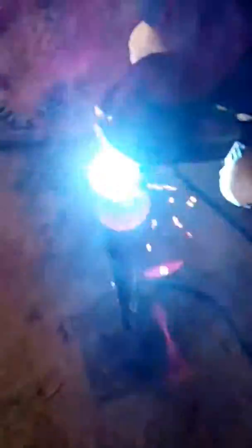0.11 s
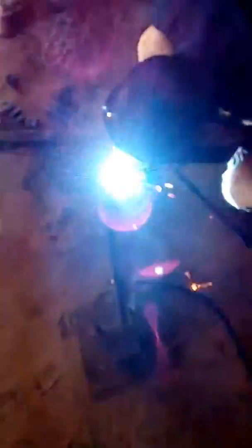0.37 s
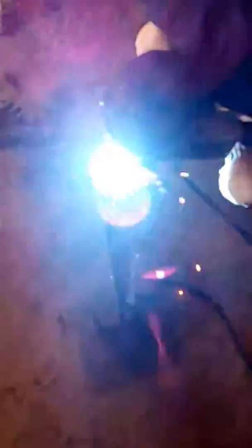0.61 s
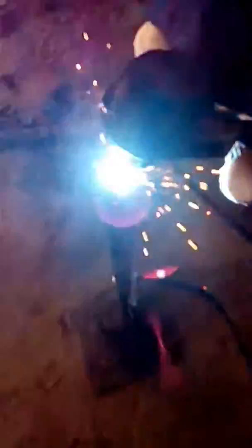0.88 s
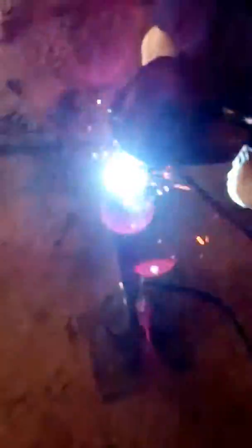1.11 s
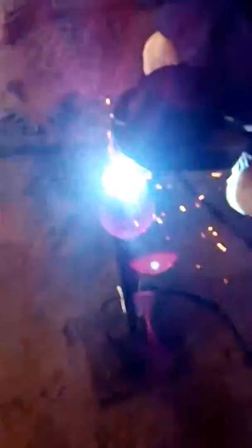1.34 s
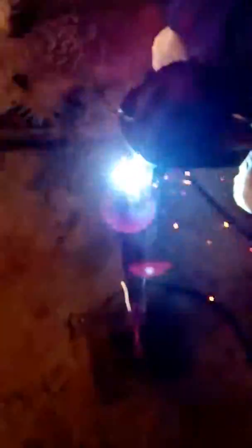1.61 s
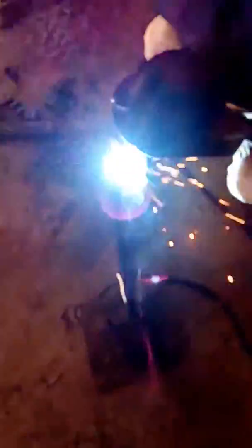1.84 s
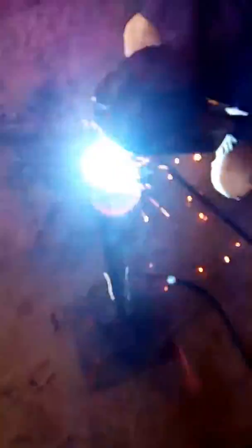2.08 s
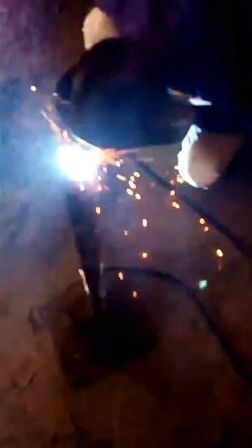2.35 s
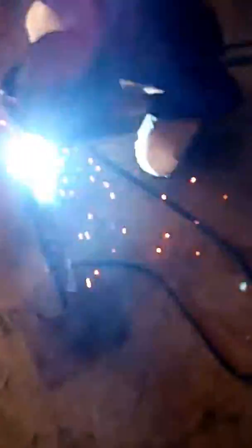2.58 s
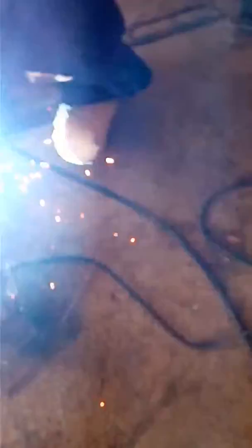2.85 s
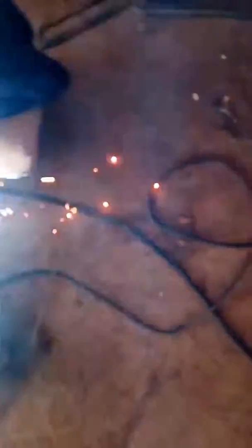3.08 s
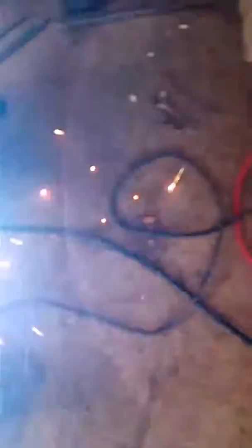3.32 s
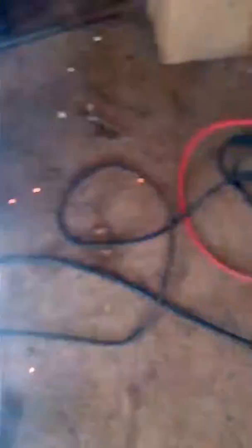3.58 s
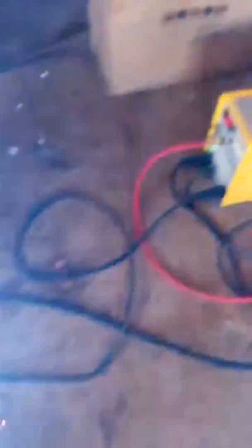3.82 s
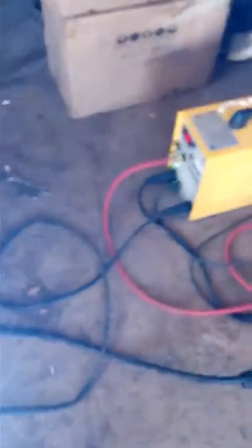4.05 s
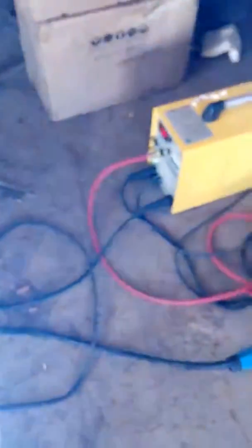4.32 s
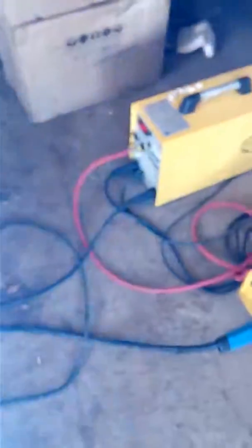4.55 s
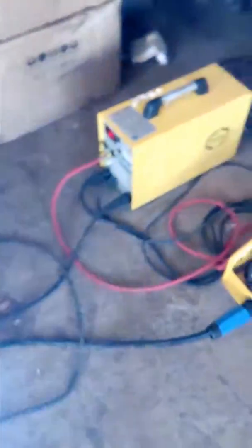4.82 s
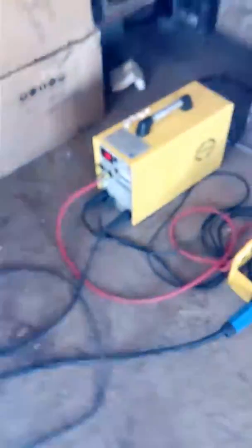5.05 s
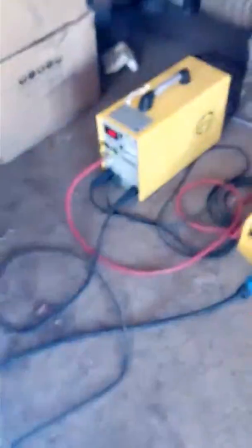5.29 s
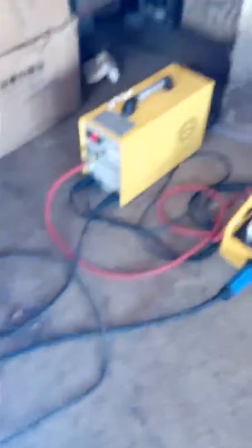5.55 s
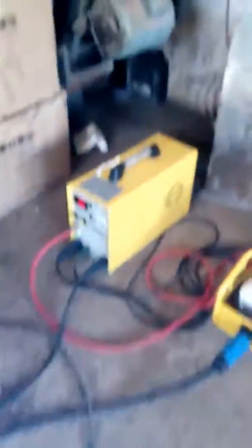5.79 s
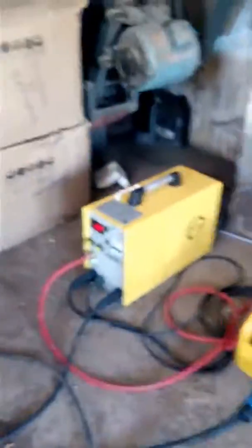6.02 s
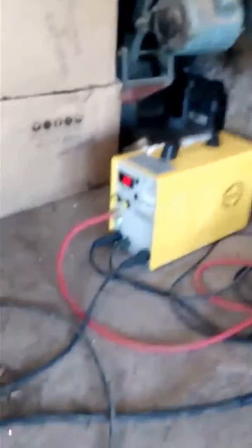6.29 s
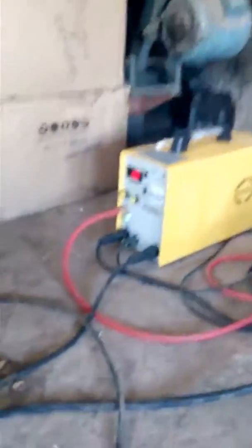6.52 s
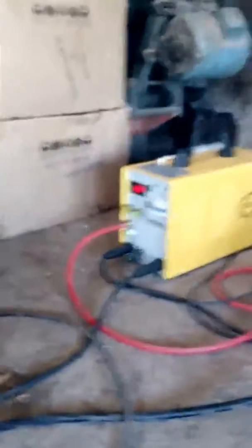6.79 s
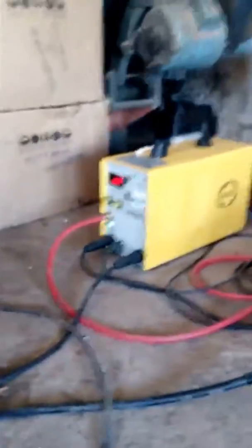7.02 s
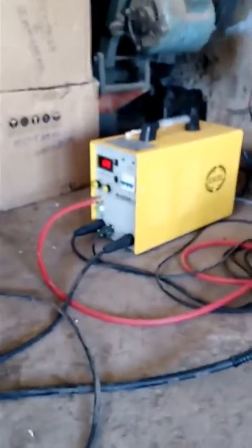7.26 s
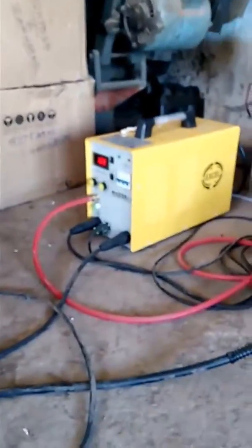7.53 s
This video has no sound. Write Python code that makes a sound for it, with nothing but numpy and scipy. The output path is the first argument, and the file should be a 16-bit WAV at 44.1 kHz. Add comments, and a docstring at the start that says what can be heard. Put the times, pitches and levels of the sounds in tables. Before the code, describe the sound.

Dense, bright, nearly even welding crackle with harsh distorted snaps and plasma hiss, short room reverberation, and a couple of soft low bumps on the microphone.

```python
"""Wire-feed welding up close

A wire-feed welding arc crackles in a workshop; a hand-held phone close by slowly turns away from it.
Each time the wire shorts and the arc strikes again it pops: a click with a short sputter of noise.
Steel, floor and walls send every pop back, the plasma hisses between, and the welder's fan hums in narrow
bands of noise. Soft low thumps push the right microphone. The two microphones are opposed in polarity
for the arc's direct sound and near echoes, and overload on the loudest peaks."""
import sys
import numpy as np
from scipy import signal
from scipy.fft import rfft, irfft, next_fast_len
from scipy.io import wavfile
from scipy.ndimage import map_coordinates

SR = 44100
rng = np.random.default_rng(int(sys.argv[2]) if len(sys.argv) > 2 else 0)


def dump_mix(stems):
    """Bounce the given channels to the path in sys.argv[1] as a 16-bit WAV at rate SR."""
    frames = np.atleast_2d(stems).T  # one column per channel
    limited = np.clip(frames, -1, 1)  # hard clip at full scale
    pcm = np.round(limited * 32767).astype(np.int16)
    wavfile.write(sys.argv[1], SR, pcm)


def elevation(decibels):
    """Turn decibel levels (scalar or array-like) into linear amplitude ratios."""
    levels = np.asarray(decibels, float)
    return 10 ** (levels / 20)


N = 336924

# The loudest re-strikes of the arc. Each row: time in seconds, level in dB before a common trim.
LOUD_STRIKES = [(0.0729, -6), (0.107, -3), (0.2327, -8), (0.2828, -6), (0.3341, -4), (0.4832, 2),
                (0.5286, 0), (0.5895, -2.5), (0.61, -7), (0.634, -6), (0.6631, -4), (0.7407, -1),
                (0.7812, 0), (0.8369, -2), (0.8746, -1.5), (0.9481, 1.5), (1, 0.5), (1.071, -10),
                (1.1843, 1), (1.2312, 0), (1.285, -1), (1.3249, 1), (1.4599, -3), (1.5332, 3.5),
                (1.5838, 2), (1.6277, 1.5), (1.7007, -2), (1.7989, -6), (1.8364, -1), (1.9031, 0),
                (1.932, 0), (1.9748, 2), (2.0542, -6), (2.1387, -2), (2.1863, 1.5), (2.2061, 2),
                (2.3166, 0), (2.357, -3.5), (2.383, -8), (2.4166, 1), (2.445, 4), (2.5846, 2.5),
                (2.6315, 1), (2.6523, 2), (2.7934, 5), (2.832, 4), (2.9008, 2), (2.9373, 2), (2.9979, 4.5),
                (3.023, 0), (3.05, -0.5), (3.0844, -2), (3.1088, 3), (3.1306, 2), (3.1558, 2), (3.2221, 5),
                (3.256, -4), (3.2881, -2), (3.3699, -0.5), (3.4066, -4), (3.4276, 1), (3.4861, -3),
                (3.5095, 5), (3.548, -1), (3.5694, 0.5), (3.6072, 3.5), (3.71, -1), (3.7585, -1),
                (3.818, -3), (4.2251, -2.5), (4.2587, 1), (4.3135, 1.5), (4.4379, -2), (4.5555, -10),
                (4.8211, 2.5), (4.8617, 1), (4.9003, -0.5), (4.9204, 2.5), (4.9521, -5), (4.9796, 1),
                (5.0115, -4), (5.0532, 1.5), (5.0782, 5), (5.1118, 3.5), (5.136, 0), (5.156, -5),
                (5.225, 0.5), (5.2463, -1), (5.2969, -6), (5.3407, -4), (5.3738, -6), (5.3999, -2),
                (5.459, -2), (5.5047, -3), (5.5243, -3), (5.5451, -1), (5.5733, -1), (5.5982, 0.5),
                (5.6199, -3), (5.682, -6), (5.7053, -5), (5.7775, -11), (5.8438, -5), (6.0434, 4),
                (6.0865, -1), (6.1156, 0), (6.1586, 4.5), (6.1962, -3), (6.2867, 3), (6.3452, -3),
                (6.4133, -7), (6.4988, 3), (6.5281, 5.5), (6.629, -3), (6.6516, 3.5), (6.8087, 4),
                (6.8508, 3), (6.904, 0), (6.9469, 2), (7.016, 1.5), (7.0651, 1.5), (7.0844, -1),
                (7.1317, 0.5), (7.1613, 5), (7.1861, 1.5), (7.2627, 4), (7.3029, -1.5), (7.3634, 0),
                (7.4536, 0.5), (7.5453, 2)]
CLICK_DB = 15   # lift of the bare clicks, ahead of the sputter's own path levels


def at_hz(points, hz):
    """A table read on a log-frequency axis."""
    table = np.array(points, float)
    return np.interp(np.log(hz + 1), np.log(table[:, 0] + 1), table[:, 1])


def in_time(rows):
    """Columns of a curve at every sample."""
    s, *columns = np.transpose(rows)
    return [np.interp(np.arange(N) / SR, s, column) for column in columns]


def samples_at(seconds):
    """Nearest sample to each time."""
    return np.round(np.asarray(seconds) * SR).astype(int)


def rms_one(x):
    """Scaled to unit rms."""
    return x / np.sqrt(np.mean(x ** 2) + 1e-20)


def causal(db):
    """Minimum-phase filter with this level per bin: it rings after a click, never before."""
    cepstrum = irfft(db * np.log(10) / 20)
    cepstrum[1:len(db) - 1] *= 2
    cepstrum[len(db):] = 0
    return np.exp(rfft(cepstrum))


def pair(shared, own, hz):
    """Left and right spectra from a shared and an opposed part, mixed to a likeness per frequency."""
    # How alike the microphones hear diffuse sound. Each row: Hz, left-right likeness from -1 to 1.
    likeness = [(60, 0.71), (130, -1), (290, -0.94), (640, -0.62), (1400, -0.019), (3090, -0.0066),
                (6800, -0.2), (15000, 0.46)]
    alike = np.clip(at_hz(likeness, hz), -.98, .98)
    opposed = np.sqrt(1 - alike) * own * np.c_[[1, -1]]
    return (np.sqrt(1 + alike) * shared + opposed) / np.sqrt(2)


def drips():
    """The wire shorts at a near-even pace from one loud strike to the next, at times striking once more midway."""
    # The drip of the wire. Each row: time in seconds, shorts per second, strike level in dB,
    # chance of a weaker strike midway (0-1).
    drip_pace = [(0, 56.7, -3, .75), (1.3, 52.4, -4, .6), (1.599, 47.2, -2.5, .35), (2.6, 46.5, -4, .3),
                 (3.3, 56.8, -1, .3), (3.9, 52.2, -2.5, .5), (4.5, 53.4, -1, .65), (5.1, 44.5, -5.5, .35),
                 (5.8, 47, -1.5, .6), (6.3, 48.4, -2.5, .3), (7.0, 49.4, -3, .3), (7.3, 50.5, -7.5, .3),
                 (7.64, 48.4, -4, .3)]
    jitter_cycles, spread_db, midway_db = .16, 2.5, -4   # jitter and spread are standard deviations
    s, per_s, level_db, chance = np.transpose(drip_pace)
    ends = [-.01] + [t for t, db in LOUD_STRIKES] + [N / SR]
    times = []
    for start, end in zip(ends, ends[1:]):
        shorts = max(1, round((end - start) * np.interp((start + end) / 2, s, per_s)))
        halves = 2 * shorts
        times += [(start + (end - start) * k / halves, k % 2) for k in range(1, halves)]
    t, midway = np.transpose(times)
    level_luck, time_luck = rng.standard_normal((2, len(t)))
    struck = (midway == 0) | (rng.random(len(t)) < np.interp(t, s, chance))
    strike_db = np.interp(t, s, level_db) + midway_db * midway + spread_db * level_luck
    t = t + jitter_cycles * time_luck / np.interp(t, s, per_s)
    return np.clip(t * SR, 0, N - 1).astype(int), elevation(strike_db) * struck


def pops():
    """When the arc strikes and how hard: loud strikes, steady drip, random rain of small ones; and the hiss level."""
    # The arc's course. Each row: time in seconds, small re-strikes per second,
    # base level in dB from which small strikes and hiss are set.
    arc_course = [(0.0, 97, -16.5), (2.53, 105, -17), (3.4, 153, -19), (3.89, 146, -15.5),
                  (4.81, 100, -16.5), (5.89, 132, -14), (6.13, 141, -11), (6.49, 160, -12.5),
                  (7.0, 94.5, -13.5), (7.32, 101, -17.5), (7.64, 186, -18.5)]
    loud_trim_db, small_db, hiss_db = -1.25, -4.5, -8.5
    per_s, level_db = in_time(arc_course)
    clicks = np.zeros(N)
    where, strength = drips()
    clicks[where] = strength
    seconds, loud_db = np.transpose(LOUD_STRIKES)
    clicks[samples_at(seconds)] = elevation(loud_db + loud_trim_db)
    sizes = elevation(3.0 * np.minimum(rng.exponential(1, N), 2.5))   # 0 to 7.5 dB above the smallest
    small = sizes * (rng.random(N) < per_s / SR)
    return clicks + elevation(level_db + small_db) * small, elevation(level_db + hiss_db)


def late(x, ms):
    """The sound read this much later, between samples."""
    return map_coordinates(x, [np.arange(N) - ms * SR / 1000], order=3)


def heard(x):
    """Direct sound, floor echo and near echoes at two microphones of opposed polarity, by their path delays."""
    # Paths as the phone turns. Each row: time in seconds, delay of the left microphone after the right in ms,
    # floor echo after the direct sound at left in ms, at right in ms.
    turning_paths = [(0, .108, 1.875, 2.005), (1.8, .108, 1.868, 1.98), (2.6, .13, 1.87, 1.95),
                     (3.0, .115, 1.86, 1.91), (3.8, .011, 1.87, 1.905), (4.6, -.034, 1.86, 1.88),
                     (5.0, -.08, 1.86, 1.95), (5.4, -.09, 1.855, 2.08), (5.8, -.113, 1.88, 2.07),
                     (6.3, -.096, 1.95, 1.84), (6.45, .385, 1.87, 1.84), (7.0, .51, 1.87, 1.84),
                     (7.64, .47, 1.87, 1.84)]
    # Nearby steel and boxes. Each row: echo delay at left in ms, at right in ms, level in dB.
    near_echoes = [(.705, .7, -14.5), (1.692, 1.68, -14.5), (2.215, 2.28, -10), (.9, 2.72, -12.5)]
    floor_db = -7.5
    lead_ms, *floor_ms = in_time(turning_paths)
    sides = []
    for k in (0, 1):
        side = x + elevation(floor_db) * late(x, floor_ms[k])
        for row in near_echoes:
            side = side + elevation(row[2]) * np.roll(x, round(row[k] * SR / 1000))
        sides.append(side)
    return np.array([-late(sides[0], lead_ms), sides[1]])


def workshop(size, hz):
    """Dense tail of the room as fading noise, weaker in the treble, for both microphones."""
    # Each row: Hz, tail against direct sound in dB.
    room_colour = [(200, 4), (1500, 3.5), (4000, -3), (12000, -7.5)]
    t60_s = 0.45
    t = np.arange(size) / SR
    tail = rng.standard_normal((2, size)) * elevation(-60 * np.minimum(t / t60_s, 3))
    tail = tail / np.sqrt(np.sum(tail ** 2, axis=1, keepdims=True))
    return elevation(at_hz(room_colour, hz)) * pair(*rfft(tail), hz)


def arc():
    """Every pop is a click with its own sputter and a floor echo; colour and tail cross-fade as the phone turns."""
    # Four headings of the phone. Each row: time in seconds, heading from 0 (facing the arc) to 3 (turned away).
    phone_turn = [(0, 0.5), (2.6, 0), (3.2, 2), (3.7, 1), (4.2, 2), (5.5, 3), (6.2, 3), (7.64, 3)]
    # Colour of the arc at each heading, overall level evened out below. Each row: Hz, relative dB per Hz.
    facing = [(88, -53), (150, -21), (355, -19.5), (551, -18), (978, -18.5), (1180, -16), (1350, -18.5),
              (1470, -5), (1920, -17), (3140, -7), (3710, -6.5), (4040, -3.5), (4950, -8), (6490, 2.5),
              (8500, -6), (11000, -35.5), (18700, -120)]
    turning = [(88, -57), (150, -21), (349, -22.5), (420, -19), (506, -30), (560, -11.5), (620, -19.5),
               (772, -20.5), (1420, -10.5), (1740, -11.5), (2160, -15), (3250, -7.5), (5120, -6.5),
               (6490, 4), (8500, -3.5), (11000, -40), (18700, -120)]
    sideways = [(88, -46), (150, -23.5), (457, -20), (560, -15.5), (675, -27.5), (746, -12), (1060, -13.5),
                (1220, -19.5), (1520, -7), (1960, -15), (2790, -9), (4320, -3.5), (5480, -4.5), (6490, 6),
                (8500, -7), (11000, -42.5), (18700, -120)]
    away = [(88, -67), (150, -22.5), (367, -24.5), (489, -28), (551, -29), (734, -15.5), (1010, -17.5),
            (1710, -9.5), (1960, -16.5), (2440, -10), (2740, -13.5), (4400, -2), (5390, -8), (6600, 1.5),
            (8500, -4.5), (11000, -16), (18700, -120)]
    # The microphones' dips and humps above their main resonance. Each row: Hz, relative dB per Hz.
    mic_treble = [(8700, -10), (9550, -24), (10200, -13), (11300, -14.5), (12000, -17), (12700, -25),
                  (13400, -33), (14300, -21), (15100, -22), (15500, -36.5)]
    # One list for each heading. Each row: Hz, left minus right colour in dB.
    leans = [
        [(120, -3.0), (300, 0.5), (800, 1.5), (1600, 1.5), (3000, 0.5), (4500, -2), (5800, 2), (6800, -6.5),
         (8000, -10.5), (10500, -8), (14500, 4)],
        [(120, 1), (300, 2), (800, 4.5), (1600, -0.5), (3000, 0.5), (4500, -2.5), (5800, 0), (6800, -1.5),
         (8000, -8.0), (10500, -4.5), (14500, 5)],
        [(120, -3.5), (300, 2.5), (800, 3), (1600, 3), (3000, -1.5), (4500, -4.5), (5800, 2.5), (6800, 1.5),
         (8000, -10.5), (10500, -4.5), (14500, -1)],
        [(120, 4), (300, 3.0), (800, 4), (1600, 5.5), (3000, 1), (4500, 4.5), (5800, -1), (6800, -1),
         (8000, -8.5), (10500, -1), (14500, 0)],
    ]
    sputter_t60_s = 0.0047
    floor_db, floor_lag_s = -4.5, .00195
    clear_db, scattered_db = -3, -5   # sputter along the clear paths, and scattered

    clicks, hiss = pops()
    heading, = in_time(phone_turn)
    fade = elevation(-60 / (sputter_t60_s * SR))
    # rough floor: its echo starts a fresh burst of sputter
    echoed = clicks + elevation(floor_db) * np.roll(clicks, round(floor_lag_s * SR))
    envelope = signal.lfilter([1], [1, -fade], echoed) + hiss
    sputter = envelope * rng.standard_normal((3, N))
    clear = heard(elevation(CLICK_DB) * clicks + elevation(clear_db) * sputter[2])

    size = next_fast_len(N + SR)
    hz, out = np.arange(size // 2 + 1) * SR / size, 0
    for k, (colour, lean) in enumerate(zip((facing, turning, sideways, away), leans)):
        # the microphones' treble stands in for the last two rows of each colour
        colour_db = at_hz(colour[:-2] + mic_treble, hz)
        sides = [causal(colour_db + side * at_hz(lean, hz) / 2) for side in (1, -1)]
        share = np.sqrt(np.clip(1 - abs(heading - k), 0, 1))
        click = elevation(CLICK_DB) * rfft(clicks * share, size)
        fizz = rfft(sputter[:2] * share, size)
        near = rfft(clear * share, size) + elevation(scattered_db) * pair(*fizz, hz)
        far = (click + fizz[0]) * workshop(size, hz)
        evened = sides / np.sqrt(np.mean(elevation(colour_db) ** 2))
        out = out + irfft((near + far) * evened, size)[:, :N]
    return out


def fan():
    """The welder's fan: air noise in a few narrow resonances."""
    # Fan and housing resonances. Each row: centre in Hz, width in Hz, level in dB rms.
    resonances = [(117, 39, -53.5), (243, 24, -46), (553, 24, -40.5), (760.4, 27, -41.5), (1145, 12, -42.5),
                  (1415, 19, -55)]
    hz, out = np.arange(N // 2 + 1) * SR / N, 0
    for centre_hz, width_hz, level_db in resonances:
        noise = pair(*rfft(rng.standard_normal((2, N))), hz)
        resonance = 1 / (1 + (2 * (hz - centre_hz) / width_hz) ** 2)
        out = out + elevation(level_db) * rms_one(irfft(noise * resonance, N))
    return out


def thumps():
    """A short soft push on the right microphone, faint at the left, that swings back and dies."""
    # Each row: time in seconds, approximate peak level at the right microphone in dB.
    pushed = [(0.072, -16), (.402, -1.5), (2.049, -21), (2.416, -20), (2.797, -18), (5.079, -6.5)]
    swing_hz, t60_s, onset_s = 105, 0.026, .001
    seconds, peak_db = np.transpose(pushed)
    pushes = np.zeros(N)
    pushes[samples_at(seconds)] = elevation(peak_db)
    t = np.arange(SR // 10) / SR
    swing = -np.cos(2 * np.pi * swing_hz * t) * elevation(-60 * t / t60_s) * (1 - np.exp(-t / onset_s))
    return np.c_[[.08, 1]] * 2 * np.convolve(pushes, swing)[:N]   # the 2 makes up for the soft onset and decay


def scene():
    """Arc, fan and thumps."""
    return arc() + fan() + thumps()


def top_cut(x):
    """Nothing passes above the cut-off."""
    return signal.sosfilt(signal.butter(12, 15550, fs=SR, output="sos"), x)


def record(dry):
    """Two overloading microphones: the loudest peaks flatten at a ceiling, then the deep bass is cut."""
    ceiling, bass_cut_hz = 0.8, 18
    flattened = np.clip(dry, -ceiling, ceiling)
    mix = signal.lfilter(*signal.butter(1, bass_cut_hz, "high", fs=SR), flattened)
    return top_cut(mix)


dry = scene()
out = record(dry)
dump_mix(out)
```